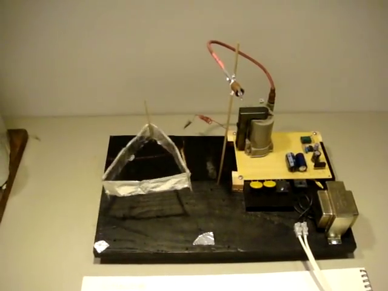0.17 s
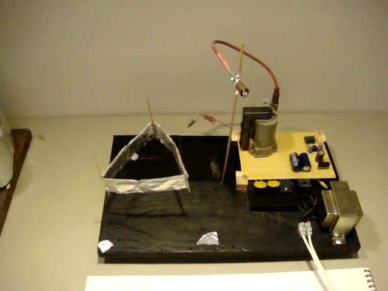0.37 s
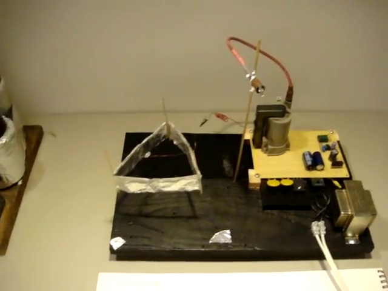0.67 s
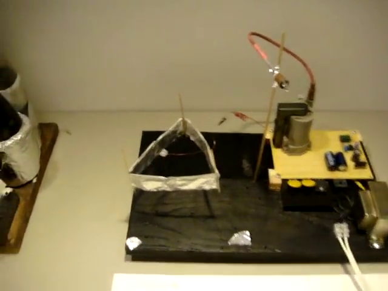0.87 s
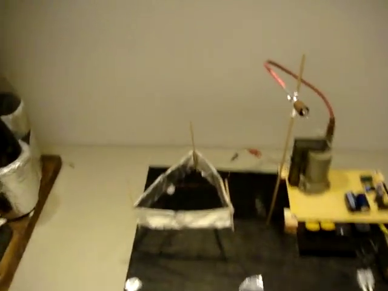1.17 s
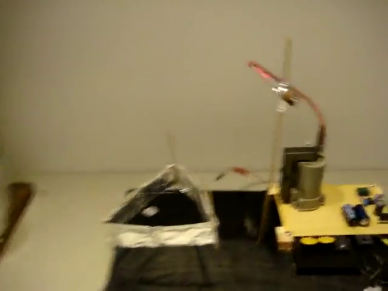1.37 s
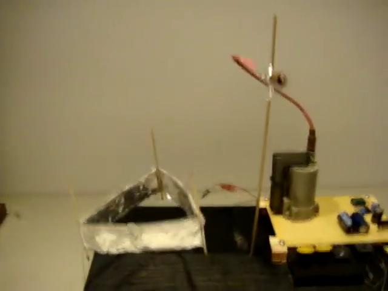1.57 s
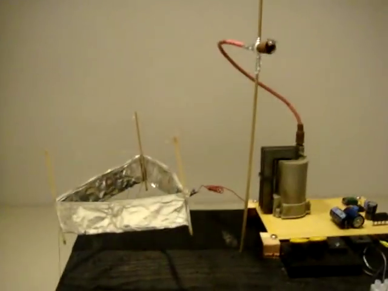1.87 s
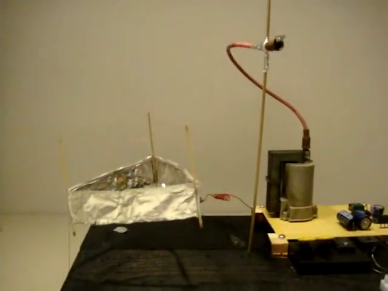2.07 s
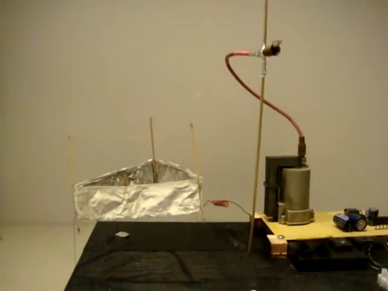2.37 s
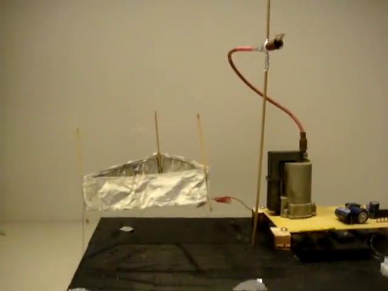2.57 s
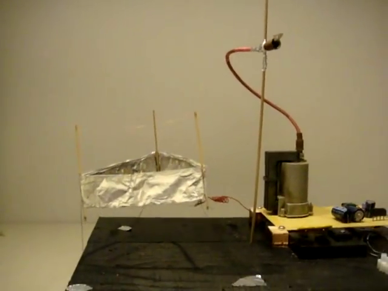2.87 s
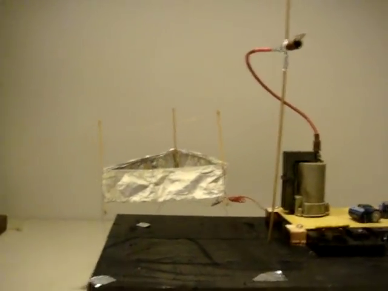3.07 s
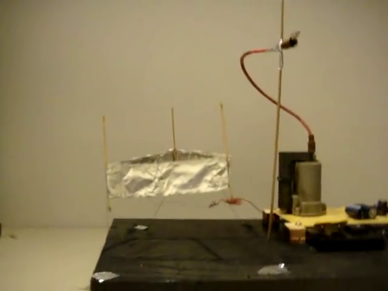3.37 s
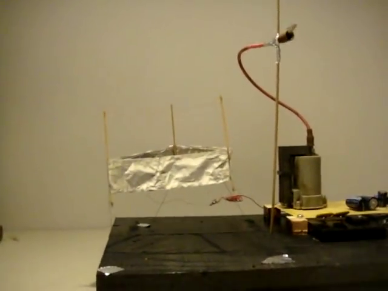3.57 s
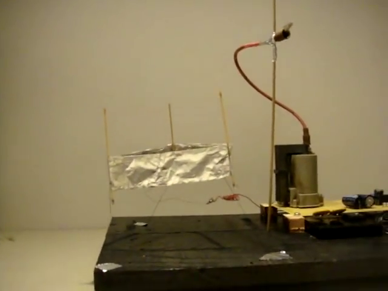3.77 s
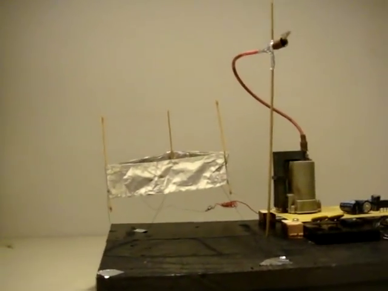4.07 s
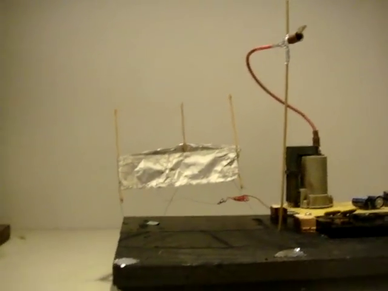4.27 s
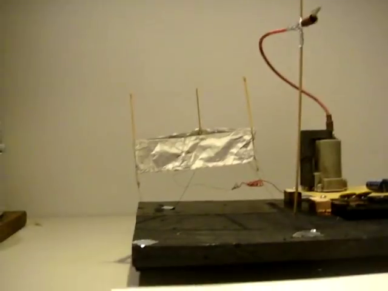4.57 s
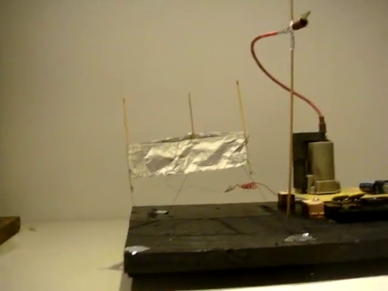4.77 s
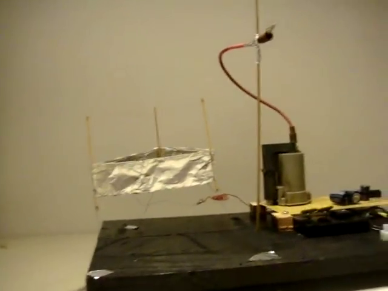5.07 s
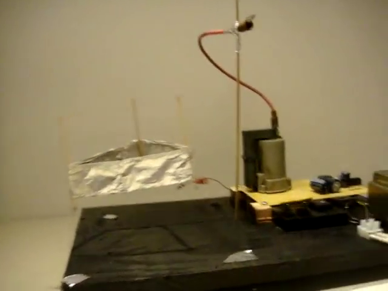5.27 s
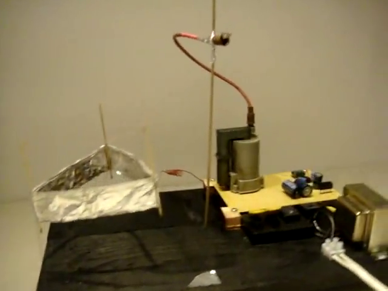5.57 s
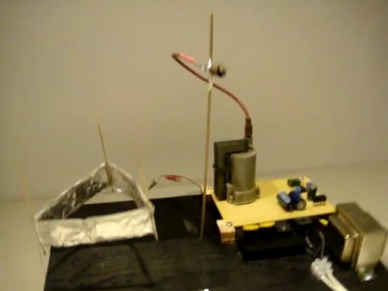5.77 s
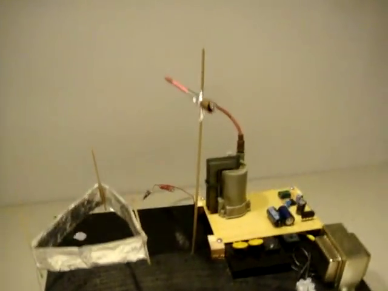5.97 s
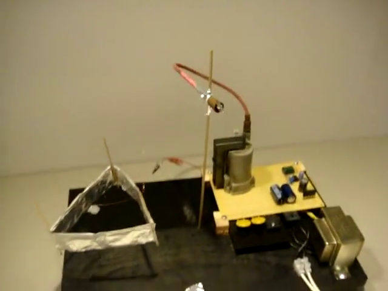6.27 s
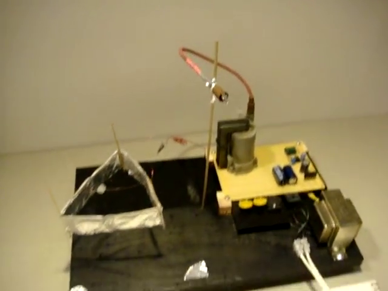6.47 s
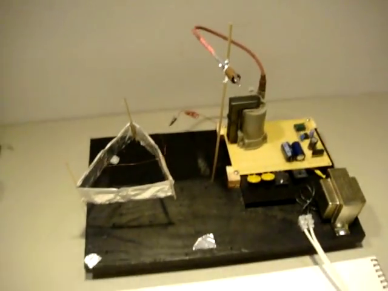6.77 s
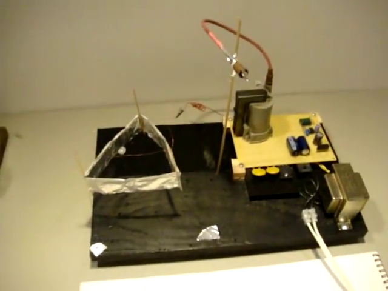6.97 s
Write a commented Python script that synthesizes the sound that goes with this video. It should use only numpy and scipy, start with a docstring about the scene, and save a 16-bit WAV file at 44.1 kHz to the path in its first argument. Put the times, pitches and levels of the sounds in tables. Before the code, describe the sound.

Close, dry, mono-like capture of crackling high-voltage hiss, bright but without extreme treble. It runs without pause, buzzing with fast ripple and irregular clicks. A sharp spark snaps near the start, followed by brief dull brushing. As the microphone sinks level with the foil, the sizzle loses body and muffled fluttering thuds emerge; after a small knock it rises and brightens again, in a small indoor room.

```python
"""In a small room, a foil ion lifter hovers over a board, fed by a homemade high-voltage supply.
Its corona wire hisses with thousands of tiny discharges that swell with the supply's ripple; larger
ones snap and put soft thuds into the microphone, over hum and rumble. One hard spark briefly dips the hiss.
The microphone sinks from above to level with the foil skirt, where the hiss is thinner, and rises again.
A soft filtered-noise rustle comes as it starts to sink; a light knock of two ringing modes comes later."""
import sys
import numpy as np
from scipy import signal
from scipy.fft import rfft, irfft
from scipy.io import wavfile

SR = 44100
rng = np.random.default_rng(int(sys.argv[2]) if len(sys.argv) > 2 else 0)


def dump(signal):
    """Clip the signal to [-1, 1] and save it as 16-bit WAV at the path in sys.argv[1]."""
    limited = np.clip(np.atleast_2d(signal).T, -1, 1)
    pcm = np.round(limited * 32767).astype(np.int16)
    wavfile.write(sys.argv[1], SR, pcm)


N = 314327
TIME = np.arange(N) / SR
RIPPLE_HZ = 120.19
CUTOFF_HZ = 10100

# the microphone's path: (time [s], height [0 level with the foil, 1 above it])
MIC_PATH = [(0, 1), (1.2, 1), (1.55, 0.92), (1.9, .42), (2.8, 0.28), (3.25, 0.28), (3.7, 0.11),
            (4.8, 0.031), (5.3, 0.22), (5.6, 0.37), (6.1, .82), (6.45, 1), (7.13, .97)]


def from_db(db):
    """Logarithmic level: 20 dB is a factor of ten in amplitude."""
    return 10 ** (np.asarray(db) / 20)


def rms_one(x):
    """Power normalisation: scale to a root mean square of one."""
    return x / np.sqrt(np.mean(x ** 2) + 1e-20)


def in_time(rows):
    """Linear interpolation: each column of a curve, at every sample."""
    times, *columns = np.transpose(rows)
    return [np.interp(TIME, times, column) for column in columns]


def at_hz(points, hz):
    """Spectral interpolation: levels joined by straight lines on a log-frequency axis."""
    corners, db = np.transpose(points)
    return np.interp(np.log(hz + 1), np.log(corners), db)


def low_pass(x, hz):
    """First-order relaxation: a one-pole low-pass."""
    pole = np.exp(-2 * np.pi * hz / SR)
    return signal.lfilter([1 - pole], [1, -pole], x + 1e-18)


def drift(hz):
    """Band-limited random fluctuation: twice low-passed noise with a spread of one."""
    noise = rng.standard_normal(N + SR)
    return rms_one(low_pass(low_pass(noise, hz), hz)[SR:])  # drop the filters' settling second


def moving_filter(x, db_at, size=2048):
    """Minimum-phase filtering: a causal response db_at(samples, Hz) that changes block by block."""
    hop = size // 4
    starts = np.arange(0, N + hop, hop)
    padded = np.pad(x, (hop, size))
    blocks = padded[starts[:, None] + np.arange(2 * hop)] * signal.get_window("hann", 2 * hop)
    hz = np.fft.rfftfreq(size, 1 / SR)
    gains = from_db(db_at(np.minimum(starts, N - 1)[:, None], hz))
    # folding the cepstrum onto positive times makes the phase minimum
    cepstrum = irfft(np.log(gains))
    cepstrum[:, 1:size // 2] *= 2
    cepstrum[:, size // 2 + 1:] = 0
    filtered = irfft(rfft(blocks, size) * np.exp(rfft(cepstrum)))
    out = np.zeros(N + 2 * size)
    for start, block in zip(starts, filtered):
        out[start:start + size] += block
    return out[hop:hop + N]


def noise_floor():
    """Stationary random noise: a steady, dull background."""
    return from_db(-61) * rms_one(low_pass(rng.standard_normal(N), 350))


def rumble(level_db):
    """Low-frequency random noise: two poles at 50 Hz leave only the rumble."""
    noise = rng.standard_normal(N)
    return from_db(level_db) * rms_one(low_pass(low_pass(noise, 50), 50))


def hum(level_db):
    """Periodic ripple of the rectified mains: an inverted sine, 1 ms behind the ripple."""
    return -from_db(level_db) * np.sin(2 * np.pi * RIPPLE_HZ * (TIME - .001))


def rustle(low_hz, high_hz):
    """Band-limited friction noise: a dull brushing that swells, holds and fades."""
    # as the microphone starts to sink: (start time [s], rms level while held [dB])
    rustles = [(1.13, -52)]
    attack_s, hold_s, release_s = 0.15, 0.16, 0.17
    corners = np.cumsum([0, attack_s, hold_s, release_s])
    envelope = sum(from_db(db) * np.interp(TIME - s, corners, [0, 1, 1, 0]) for s, db in rustles)
    band = signal.butter(2, [low_hz, high_hz], "band", fs=SR, output="sos")
    return envelope * rms_one(signal.sosfilt(band, rng.standard_normal(N)))


def knocks():
    """Modal decay: an impact sets a few short damped sines ringing."""
    # a light knock, perhaps the lifter touching the board: (time [s], level [dB])
    knock_times = [(5.575, -37)]
    # what it rings with: (frequency [Hz], level relative to the knock [dB], time to fall 60 dB [s])
    modes = [(820, -5, .025), (1120, 1, .035)]
    out = np.zeros(N)
    for s, db in knock_times:
        age = np.maximum(TIME - s, 0)
        for hz, mode_db, t60 in modes:
            decay = np.exp(-np.log(1000) * age / t60)
            out += from_db(db + mode_db) * decay * np.sin(2 * np.pi * hz * age)
    return out


def hard_sparks(thud_s, dip, dip_s):
    """Impulsive discharge: a snap and a thud per spark, and the gain of the hiss, which dips after it."""
    # single hard sparks: (time [s], snap impulse [dB], thud peak [dB])
    spark_list = [(0.871, -17, -29)]
    sound, hiss_gain = np.zeros(N), np.ones(N)
    for s, snap_db, thud_db in spark_list:
        age = np.maximum(TIME - s, 0)
        sound[round(s * SR)] -= from_db(snap_db)
        sound -= from_db(thud_db) * age / thud_s * np.exp(1 - age / thud_s)
        hiss_gain *= 1 - dip * (age > 0) * (age < dip_s)
    return sound, hiss_gain


def large_discharges(ripple, per_s, depth, unevenness, spread_db):
    """Relaxation oscillation: charge builds with the ripple and lets go at uneven thresholds."""
    charge = np.cumsum(per_s * np.maximum(1 + depth * ripple, 0)) / SR
    draws = rng.standard_normal((4000, 2))
    thresholds = np.cumsum(np.exp(unevenness * draws[:, 0]))
    at = np.searchsorted(charge, thresholds)
    clicks = np.zeros(N)
    clicks[at[at < N]] = from_db(spread_db * np.clip(draws[at < N, 1], -2, 2))
    return clicks


def thuds(clicks, corner_hz):
    """Electric-field pickup: each jump of the field reaches the microphone as a blip of a few ms."""
    blips = low_pass(low_pass(low_pass(-clicks, corner_hz), corner_hz), 2 * corner_hz)
    return signal.sosfilt(signal.butter(1, 11, "high", fs=SR, output="sos"), blips)


def discharges(per_s, spread_db):
    """Random point process: clicks of one sign and uneven size at random moments."""
    happens = rng.random(N) < per_s / SR
    return happens * from_db(spread_db * np.clip(rng.standard_normal(N), -2, 2))


def fizz(ripple, per_s, depth, spread_db):
    """Modulated shot noise: tiny discharges along the wire crowd at each voltage crest."""
    rate = per_s * np.maximum(1 + depth * ripple, 0)
    return rms_one(discharges(rate, spread_db) * rng.choice([-1, 1], N))


def corona(ripple, snaps, split_hz, snap_db, flutter_db):
    """Corona discharge: streamers throb below the split, finer glow is steadier above; snaps stand out."""
    streamers = fizz(ripple, per_s=9000, depth=.42, spread_db=3.5)
    glow = fizz(ripple, per_s=20000, depth=0.23, spread_db=4.0)
    hiss = signal.sosfilt(signal.butter(2, split_hz, "low", fs=SR, output="sos"), streamers)
    hiss += signal.sosfilt(signal.butter(2, split_hz, "high", fs=SR, output="sos"), glow)
    flutter = from_db(flutter_db * drift(8.1))
    # each snap scatters off the foil for a millisecond or so
    scatter = np.sqrt(low_pass(snaps ** 2, 260)) * rng.standard_normal(N)
    return rms_one(hiss * flutter - from_db(snap_db) * rms_one(1.02 * snaps + scatter))


def room(x, t60, wet_db, early_db, count=10):
    """Reverberation: early reflections whose paths change with height, then a smooth diffuse tail."""
    height = low_pass(in_time(MIC_PATH)[0] - 1, 2) + 1
    delays_s = np.geomspace(.002, .016, count) * rng.uniform(.9, 1.1, count)
    slides_s = rng.uniform(-.0018, .0018, count)  # extra delay per unit of height
    out = x.copy()
    for delay_s, slide_s in zip(delays_s, slides_s):
        lag = np.round((delay_s + slide_s * height) * SR).astype(int)
        out += from_db(early_db) * rng.choice([-1, 1]) * x[np.clip(np.arange(N) - lag, 0, N - 1)]
    lingering_power = low_pass(x ** 2, np.log(1000) / (np.pi * t60))
    return out + from_db(wet_db) * np.sqrt(lingering_power) * rng.standard_normal(N)


def heard_from(x, board_echo, wall_echo):
    """Directivity and comb filtering: colour by height, with two near reflections that move with it."""
    # hiss from above: (frequency [Hz], relative spectral level [dB])
    above = [(100, -22.5), (480, -19.5), (680, -10), (850, -5.5), (1400, -5), (1900, 2.26), (3000, 2),
             (4000, 4), (4700, 0), (5700, 0.8), (6600, -0.5), (8200, 0.04), (10000, -3)]
    # hiss from the side: (frequency [Hz], relative spectral level [dB])
    sideways = [(100, -18.5), (450, -19), (600, -15.5), (800, -14.5), (1400, -11), (1900, -6.5), (3000, -2),
                (4000, -5), (4700, -2.5), (5700, -0.8), (6500, -1.7), (8000, 1.5), (10000, -3.5)]
    # resonances of foil, board and case:
    # (centre [Hz], width [Hz], boost from above [dB], boost from the side [dB])
    resonances = [(1106, 140, 7, 5.5), (1600, 160, -0.5, 1.5), (2224, 240, 3.5, -2.3), (2330, 280, -2, 4.5),
                  (2760, 260, 1.6, -2), (3430, 330, -1.5, 3.5), (4104, 310, -0.8, 5.5), (5130, 240, 0, 3),
                  (8600, 140, 2.5, -2.5), (9580, 900, 2, 5)]
    # reflection delays: (level with the foil [ms], above it [ms])
    board_echo_ms = (0.21, 0.58)
    wall_echo_ms = (1.85, 1.46)
    height, = in_time(MIC_PATH)

    def db_at(at, hz):
        """Superposition: spectrum, resonances and echoes at the given samples."""
        up = height[at]
        db = up * at_hz(above, hz) + (1 - up) * at_hz(sideways, hz)
        for centre, width, above_db, side_db in resonances:
            bump = .5 ** ((2 * (hz - centre) / width) ** 2)
            db = db + (up * above_db + (1 - up) * side_db) * bump
        board_ms = np.interp(up, [0, 1], board_echo_ms)
        wall_ms = np.interp(up, [0, 1], wall_echo_ms)
        turn = -2j * np.pi * hz / 1000  # phase per ms of delay
        # the board reflects most at a grazing angle
        board = board_echo * (1 - up) * np.exp(turn * board_ms)
        wall = wall_echo * np.exp(turn * wall_ms)
        return db + 20 * np.log10(abs(1 + board + wall))
    return moving_filter(x, db_at)


def scene():
    """Common modulation: one mains ripple drives hiss, thuds and hum; one microphone feeds both channels."""
    # loudness of the hiss at the microphone: (time [s], treble level before the hiss gain [dB])
    hiss_levels = [(0.0, -32), (0.95, -32.5), (2.06, -32.5), (2.16, -34.5), (3.14, -35), (3.61, -37.5),
                   (4.52, -36), (5.38, -36.5), (5.62, -33.5), (7.13, -32.5)]
    # closeness to the high voltage: (time [s], thud level [dB])
    thud_levels = [(0, -59.5), (.65, -60), (1.4, -54), (2.8, -50.5), (5.3, -50.5), (5.9, -55), (7.13, -59)]
    hiss_gain_db = 6
    hum_db, rumble_db = -11.5, -8  # relative to the thuds
    (hiss_db,), (thud_db,) = in_time(hiss_levels), in_time(thud_levels)
    ripple = np.sin(2 * np.pi * RIPPLE_HZ * TIME)

    background = noise_floor() + rumble(thud_db + rumble_db) + hum(thud_db + hum_db)
    handling = rustle(low_hz=382, high_hz=700)
    sparks, spark_dip = hard_sparks(thud_s=0.00074, dip=0.38, dip_s=0.0052)

    snaps = large_discharges(ripple, per_s=230, depth=.6, unevenness=.85, spread_db=2.5)
    pickup = from_db(thud_db) * rms_one(thuds(snaps, corner_hz=346))
    wire = corona(ripple, snaps, split_hz=4700, snap_db=-8.0, flutter_db=0.29)
    wire_in_room = room(wire, t60=0.12, wet_db=-8.5, early_db=-22.5)
    coloured = heard_from(wire_in_room, board_echo=0.14, wall_echo=0.067)
    hiss = from_db(hiss_db + hiss_gain_db) * coloured

    mix = background + handling + knocks() + sparks + pickup + hiss * spark_dip
    return np.tile(mix, (2, 1))


def record(dry):
    """Band limitation: a linear-phase low-pass cuts the top steeply."""
    taps = signal.firwin(801, CUTOFF_HZ, window=("kaiser", 8), fs=SR)
    return signal.fftconvolve(dry, taps[None], "same", axes=1)


dry = scene()
out = record(dry)
dump(out)
```